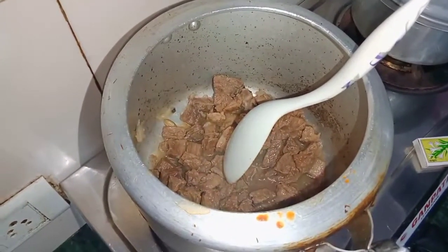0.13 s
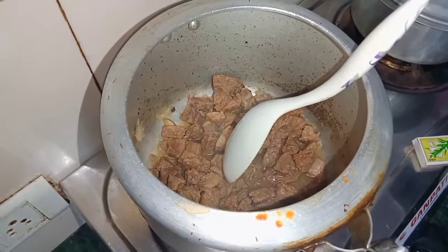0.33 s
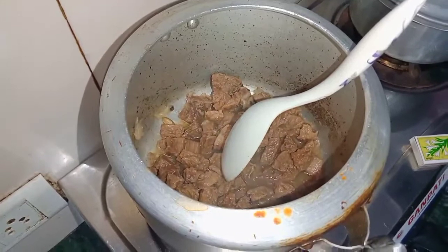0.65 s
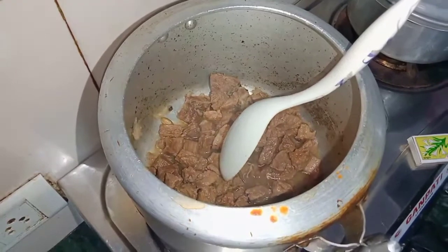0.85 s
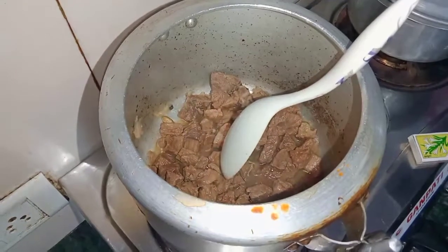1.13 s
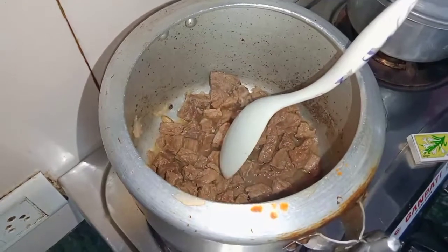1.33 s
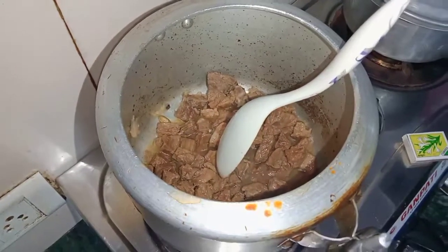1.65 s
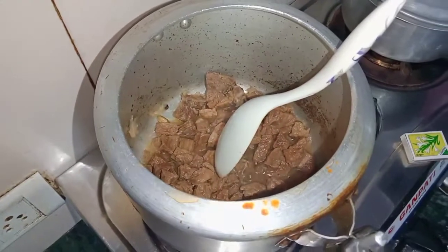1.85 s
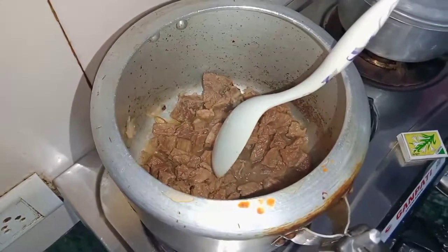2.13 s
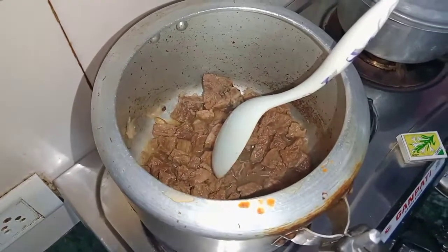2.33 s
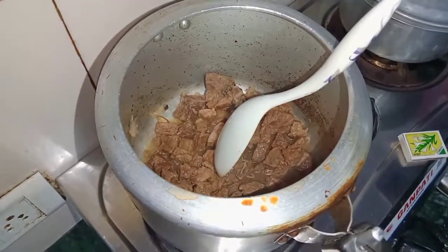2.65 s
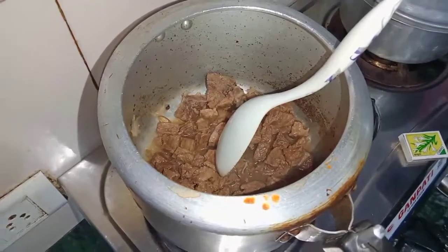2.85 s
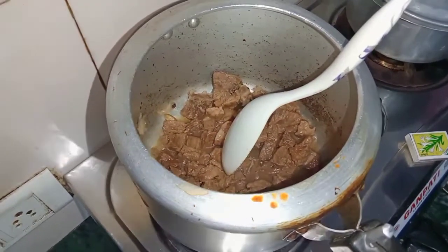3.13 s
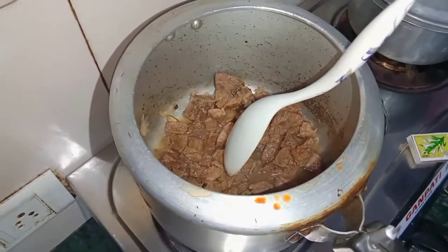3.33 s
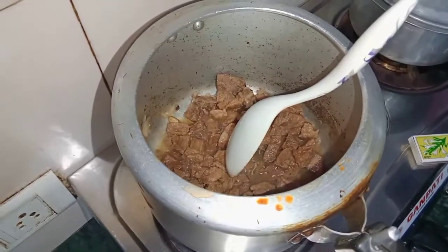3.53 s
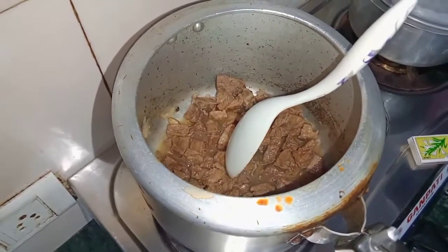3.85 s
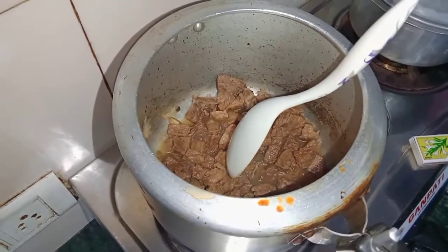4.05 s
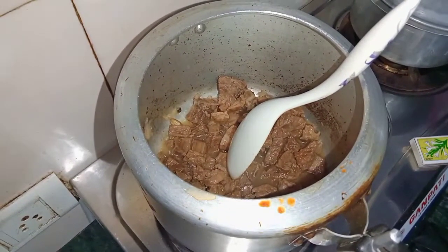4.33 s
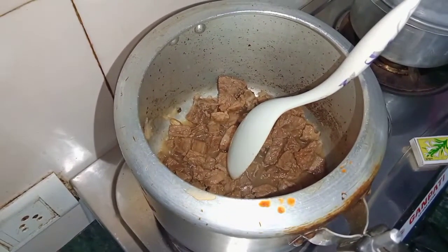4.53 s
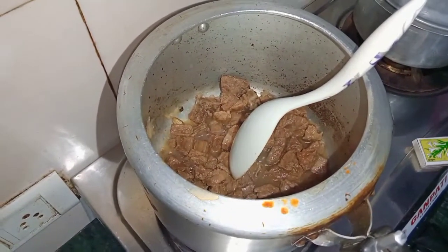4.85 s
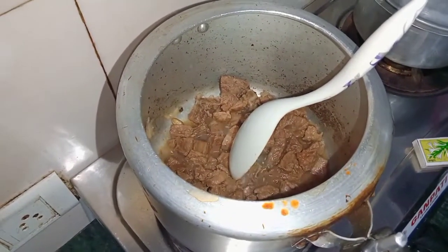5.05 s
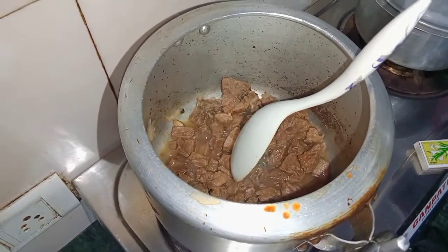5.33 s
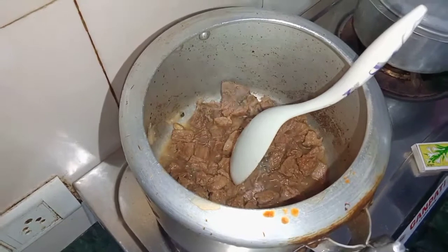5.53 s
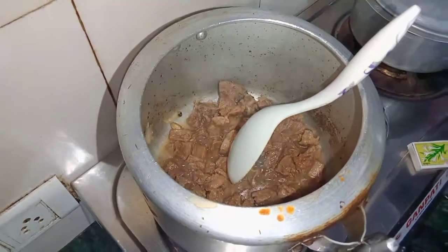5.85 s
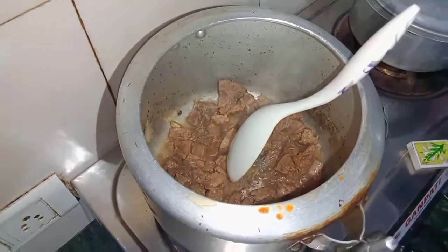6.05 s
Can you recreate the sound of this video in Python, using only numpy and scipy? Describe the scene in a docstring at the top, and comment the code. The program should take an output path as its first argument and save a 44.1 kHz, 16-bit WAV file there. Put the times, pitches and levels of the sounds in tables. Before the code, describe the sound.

Meat simmers and spits softly over a gas flame while metal cookware clatters in two flurries, then a silent gap and a final clunk.

```python
"""Meat simmers in an open pressure cooker on a gas ring in a small tiled kitchen: droplets spit, bubbles fizz.
Under it lie a flame, shaped noise, and a low drone of narrow noise bands that swells at times.
Close by, metal cookware is dragged, struck and rocked in two flurries: noisy crashes, ringing modes, stick-slip.
Then all sound cuts out for about 0.6 s; a faint rustle of grainy noise lies on either side of the gap.
Last, something stout is set down with a clunk, ringing in short modes. Both channels are the same."""
import sys
import numpy as np
from scipy import signal
from scipy.fft import irfft, next_fast_len
from scipy.io import wavfile
from scipy.ndimage import uniform_filter1d

SR = 44100
rng = np.random.default_rng(int(sys.argv[2]) if len(sys.argv) > 2 else 0)


def generate_wav(sig):
    """Save sig (samples, or channels by samples) to the path in sys.argv[1] as 16-bit PCM at SR."""
    pcm = np.round(np.clip(np.atleast_2d(sig).T, -1, 1) * 32767).astype(np.int16)
    wavfile.write(sys.argv[1], SR, pcm)


N = 273111


def cookware():
    """Impact and friction excite the modes of thin metal shells; the kind of contact sets spectrum and onset."""
    # modes of the cookware: f/Hz, relative level/dB, undamped t60/s
    cookware_modes = [(319.5, 1, 0.37), (372, 0, 0.49), (448, 1.5, .45), (577, -7, 0.67), (681, -6.5, 0.65),
                      (825.6, -7.5, 0.5), (996, -9.5, .37), (1081, -14.5, 1), (1276, -10, 0.62),
                      (1790, -15, 1), (1945, -11, .5), (2293, -14, .9), (2420, -9.5, .45),
                      (2730, -11.5, .5), (3097, -12, .4), (3160, -13, .35), (3400, -15, .55),
                      (3970, -14.5, .32), (4230, -10.5, 0.32), (5070, -8.5, 0.18), (8100, -22.5, .25)]
    thin_shell = weak_modes(spacing_hz=24, spread_db=1.5)
    knocks = blows(cookware_contacts(), cookware_modes, thin_shell, ring_db=0, crowd_db=-6.5, crash_db=1.5,
                   crash_life=0.95, treble_life=0.84, grain_db=0.0, full_ring_s=0.47, lowest_hz=120)
    return knocks + shudders(attack_s=0.012, sag_db_per_s=42, release_t60=0.17, wobble_db=1.4, wobble_hz=3)


def cookware_contacts():
    """Contact stiffness: strikes start fast, scrapes fast or slower row by row, bass-heavy thuds over 23 ms."""
    # metal strikes metal, sharp and bright:
    # t/s, level/dB, treble relative to the middle/dB, nominal t60/s, favoured f/Hz
    strike_rows = [(1.505, -30, -0.5, 0.61, 2370), (1.685, -14.5, -1, 0.33, 1100),
                   (1.992, -26.5, -9.5, 0.27, 4930), (2.008, -24, -3.5, 0.23, 1970),
                   (2.901, -24, -7.5, .24, 3400), (2.966, -24, 0, 0.22, 4360),
                   (3.0905, -17.5, -4, 0.24, 3040), (3.304, -21, -8.5, 0.29, 2200)]
    # a pot rocks and lands dully on its support: t/s, level/dB, nominal t60/s, favoured f/Hz
    thud_rows = [(1.527, -24.5, 0.23, 392), (1.711, -36.5, 0.097, 680), (2.012, -31.5, 0.099, 440),
                 (2.2, -39.5, 0.064, 337), (2.712, -31.5, 0.13, 520), (2.725, -27, 0.19, 850),
                 (3.102, -30, 0.089, 740)]
    # a pot is nudged or scrapes a little: t/s, level/dB, rise/s, treble relative to the middle/dB
    scrape_rows = [(1.456, -34.5, 0.0015, -7.5), (1.578, -42, 0.0037, -7), (1.655, -30.5, 0.0011, -2),
                   (1.892, -34.5, 0.0042, -7), (2.705, -36.5, 0.024, 6), (2.85, -35.5, .035, -4.5),
                   (3.06, -39, .005, 1), (3.36, -26.5, 0.012, -11)]
    # a rim gives a short clack: t/s, level/dB, favoured f/Hz
    clink_rows = [(1.943, -35, 2050), (3.293, -26, 2360)]
    strikes = [contact(s, db, rise_s=0.00067, t60=t60, bass_db=-6.5, treble_db=treble_db,
                       favoured_hz=hz, boost_db=7.0, width=0.11)
               for s, db, treble_db, t60, hz in strike_rows]
    thuds = [contact(s, db, rise_s=0.023, t60=t60, bass_db=5, treble_db=-10.5,
                     favoured_hz=hz, boost_db=6, width=0.094)
             for s, db, t60, hz in thud_rows]
    scrapes = [contact(s, db, rise_s=rise_s, t60=0.43, bass_db=0.5, treble_db=treble_db,
                       favoured_hz=760, boost_db=7, width=0.053)
               for s, db, rise_s, treble_db in scrape_rows]
    clinks = [contact(s, db, rise_s=0.0065, t60=0.04, bass_db=4, treble_db=-4.5,
                      favoured_hz=hz, boost_db=20, width=0.63)
              for s, db, hz in clink_rows]
    return strikes + thuds + scrapes + clinks


def shudders(attack_s, sag_db_per_s, release_t60, wobble_db, wobble_hz):
    """Stick-slip friction holds one low mode of a dragged pot ringing, unsteadily, until the pot stops."""
    # hollow tones: t/s, length/s, rms level before the sag/dB, f/Hz
    shudder_rows = [(1.525, .24, -16.5, 577), (1.526, .045, -21, 325.2), (1.529, .11, -28.5, 372),
                    (2.96, 0.049, -21.5, 639.4), (2.98, 0.022, -12.5, 373.8)]
    out, t = np.zeros(N), np.arange(SR) / SR
    for s, length, db, hz in shudder_rows:
        turns = np.cumsum(hz + wobble_hz * flicker(SR, smooth_s=0.03)) / SR
        level = from_db(db - sag_db_per_s * t + wobble_db * flicker(SR, smooth_s=0.02))
        envelope = np.minimum(t / attack_s, 1) * dying(np.maximum(t - length, 0), release_t60)
        add(out, s, np.sqrt(2) * level * envelope * np.sin(2 * np.pi * turns))
    return out


def clunk():
    """Impact on a stout body: a heavy thing lands squarely and settles, and its modes die soon."""
    # the clunk and its settling blows:
    # t/s, level/dB, treble relative to the middle/dB, nominal t60/s, favoured f/Hz
    clunk_rows = [(5.4638, -23, 2, 0.41, 724), (5.481, -26, -4, 0.46, 1460), (5.515, -24.5, -16, 0.31, 430)]
    # modes of the thing set down: f/Hz, relative level/dB, undamped t60/s
    stout_modes = [(349, 3.5, 0.13), (430, -12, 0.59), (520, 0.5, .34), (816, 10, 0.21), (1062, -0.5, 0.4),
                   (1460, 3, 0.25), (1707, 4.5, 0.26), (2860, 6.5, 0.11), (3075, 11, 0.18),
                   (3470, 11.5, .1), (3740, 4, 0.2), (4290, -12, .18), (4610, -2, .17), (5670, 0, 0.17),
                   (7880, -15, .2), (8100, -12, 0.29)]
    contacts = [contact(s, db, rise_s=0.0018, t60=t60, bass_db=10.0, treble_db=treble_db,
                        favoured_hz=hz, boost_db=4, width=0.25)
                for s, db, treble_db, t60, hz in clunk_rows]
    thick_shell = weak_modes(spacing_hz=40, spread_db=2)
    return blows(contacts, stout_modes, thick_shell, ring_db=-5.0, crowd_db=-18.0, crash_db=-1.0,
                 crash_life=0.75, treble_life=0.43, grain_db=3.5, full_ring_s=0.18, lowest_hz=264)


def contact(s, db, rise_s, t60, bass_db, treble_db, favoured_hz, boost_db, width):
    """Excitation of one blow: time, rise, decay, low, middle and high levels, and the region it favours."""
    return s, rise_s, t60, db + bass_db, db, db + treble_db, favoured_hz, boost_db, width


def blows(rows, modes, crowd, ring_db, crowd_db, crash_db, crash_life, treble_life, grain_db, full_ring_s, lowest_hz):
    """Modal synthesis: each blow is a noisy crash that leaves strong modes and a crowd of weak ones ringing."""
    # the crowd of weak modes between the strong ones: f/Hz, relative density/dB per Hz
    clatter = [(60, -67.5), (130, -28.5), (250, -31), (340, -32), (700, -24), (1200, -31.5), (2100, -31.5),
               (3200, -32), (4600, -37), (6800, -45), (8800, -47.5), (10000, -51.5), (12500, -57),
               (15500, -52)]
    # where a blow's low, middle (two ends) and high levels hold: f/Hz
    zones_hz = [520, 1300, 3000, 5500]
    out, t, hz = np.zeros(N), np.arange(SR) / SR, bins(SR)
    treble = hz ** 4 / (hz ** 4 + 7000 ** 4)   # share of the power that dies sooner
    radiated = hz ** 2 / np.hypot(hz ** 2, lowest_hz ** 2)   # a small body gives out little bass

    def fading(colour, t60):
        """Frequency-dependent damping: a ring of this colour dulls as it fades."""
        body = noise(colour * np.sqrt(1 - treble), SR) * dying(t, t60)
        top = noise(colour * np.sqrt(treble), SR) * dying(t, t60 * treble_life)
        return body + top

    for s, rise, t60, low_db, middle_db, high_db, favoured_hz, boost_db, width in rows:
        zones = list(zip(zones_hz, [low_db, middle_db, middle_db, high_db]))

        def strength_db(f):
            """Point excitation: the contact point favours one region of the spectrum."""
            favour = np.exp(-(np.log((f + 1) / favoured_hz) / width) ** 2)
            return at_hz(zones, f) + boost_db * favour

        colour = from_db(at_hz(clatter, hz) + strength_db(hz)) * radiated
        # every spot on the shell is near the nodes of some modes and the crests of others
        colour = colour * uneven(hz, step_hz=110, depth_db=4)
        # with grain above 0 dB the surfaces chatter while they are still in touch
        grain = rms_one(uniform_filter1d(rng.standard_normal(SR), size=70))
        chatter = from_db(grain_db * grain * np.exp(-t / 0.013))
        sound = from_db(crash_db) * fading(colour, t60 * crash_life) * chatter
        # weak modes are scarce in the bass, where the few strong ones rule
        crowd_colour = colour * crowd * hz ** 2 / (hz ** 2 + 700 ** 2)
        sound += from_db(crowd_db) * fading(crowd_colour, t60 * 1.59)
        held = min(t60 / full_ring_s, 1)   # a hand on the metal damps its ring
        for mode_hz, mode_db, mode_t60 in modes:
            level = from_db(mode_db + ring_db + strength_db(mode_hz) + rng.normal(0, 1))
            sound += level * np.sin(2 * np.pi * (mode_hz * t + rng.random())) * dying(t, mode_t60 * held)
        rise = max(rise, 0.0005)
        onset = np.minimum(t / rise, 1) / dying(rise, max(t60, 0.1))   # makes up for decay during the rise
        add(out, s, sound * onset)
    return out


def weak_modes(spacing_hz, spread_db, count=1200):
    """Modal density: a shell's weak modes lie at uneven steps and strengths; one value per hertz, rms 1."""
    lines = np.zeros(SR // 2 + 1)
    at = np.cumsum(rng.uniform(0.3, 1.7, count) * spacing_hz).astype(int)
    sizes = from_db(spread_db * np.clip(rng.standard_normal(len(at)), -2, 1.3))
    in_range = at < len(lines)
    lines[at[in_range]] = sizes[in_range]
    return rms_one(lines)


def spits(level_db, t60, width, splash_db):
    """Impulsive noise: each bursting fat droplet is a short pitched tick inside a broad splash."""
    # fat spits: t/s, level/dB, f/Hz
    spit_rows = [(.215, -55, 7600), (.404, -56, 12500), (0.574, -36, 6250), (.614, -42, 6400),
                 (.767, -52, 12000), (1.356, -42.5, 6460), (1.921, -43, 6830), (2.215, -44.5, 6600),
                 (2.41, -52.5, 7100), (2.861, -44, 12000), (3.227, -40, 6640), (3.575, -47, 7300),
                 (3.979, -41, 6360), (4.018, -49, 15100), (4.987, -44.5, 3030), (5.273, -45.5, 7940),
                 (5.389, -40.5, 6500), (5.745, -46, 7300), (6.047, -42, 7400)]
    out, t, hz = np.zeros(N), np.arange(SR // 4) / SR, bins(SR // 4)
    splash = from_db(splash_db) * hz ** 2 / (hz ** 2 + 3500 ** 2)
    for s, db, pitch_hz in spit_rows:
        tick = np.exp(-(np.log((hz + 1) / pitch_hz) / width) ** 2)
        add(out, s, from_db(db + level_db) * rms_one(noise(tick + splash, len(t))) * dying(t, t60))
    return out


def fizz(per_s, spread_db, ring_s, count=12):
    """Shot noise: tiny bubbles of uneven size and pitch burst at random in the gravy."""
    # colour of a bubble's pop: f/Hz, relative density/dB per Hz
    fizz_colour = [(300, -15), (2000, 21), (5000, 1), (8000, 0), (11000, -7.5), (15500, -5.5)]
    # the frying is steady but for a few livelier spells: from t/s, to t/s, extra level/dB
    fizz_spells = [(.05, .27, 3), (2.45, 2.95, 4.3), (4.18, 4.3, 16.8), (4.8, 5.02, 10), (5.05, 6.3, 3.2)]
    steady_db, edge_s = -53, 0.091
    sizes = from_db(spread_db * np.minimum(rng.exponential(1, N), 4))
    pops = (rng.random(N) < per_s / SR) * sizes
    t, hz = np.arange(SR // 10) / SR, bins(SR // 10)
    dealt = rng.integers(0, count, N)   # which of the pop sounds each bubble takes
    out = 0
    for k in range(count):
        pitched = uneven(hz, step_hz=500, depth_db=11)
        pop = noise(from_db(at_hz(fizz_colour, hz)) * pitched, len(t)) * dying(t, ring_s)
        out = out + signal.oaconvolve(pops * (dealt == k), pop)[:N]
    return from_db(steady_db + spells(fizz_spells, edge_s)) * rms_one(out)


def rustle(edge_s, grain_db):
    """Amplitude-modulated noise: something brushes lightly past, grainy and bright."""
    # faint bright rustles: from t/s, to t/s, level/dB
    rustle_rows = [(4.168, 4.25, -47), (4.886, 4.957, -50)]
    # colour of the rustle: f/Hz, relative density/dB per Hz
    rustle_colour = [(1500, -4), (4000, -4), (9500, -4), (15500, -3)]
    size = next_fast_len(N)
    hiss = noise(from_db(at_hz(rustle_colour, bins(size))), size)[:N]
    hiss = hiss * from_db(grain_db * flicker(N, smooth_s=0.0028))
    gains = [(start, end, from_db(db)) for start, end, db in rustle_rows]
    return rms_one(hiss) * spells(gains, edge_s)


def background():
    """Incoherent sum: the flame and the drone add up, and their common level dips briefly."""
    # the dip: from t/s, to t/s, change of level/dB
    lull_rows = [(2.26, 2.48, -4)]
    return from_db(spells(lull_rows, edge_s=0.055)) * (flame_roar() + low_drone())


def flame_roar():
    """Turbulent combustion noise: a soft steady roar with a broad spectrum."""
    # gas flame: f/Hz, relative density/dB per Hz
    flame_colour = [(25, -65.5), (55, -76), (85, -69.5), (115, -61), (280, -66), (550, -64.5), (950, -71.5),
                    (1500, -71.5), (3000, -80), (4500, -87.5), (6500, -99.5), (8500, -102.5), (11000, -106),
                    (15500, -104)]
    size = next_fast_len(N)
    hz = bins(size)
    # the corner behind the stove colours the roar with narrow resonances
    colour = from_db(at_hz(flame_colour, hz)) * uneven(hz, step_hz=22.35, depth_db=2.0)
    return from_db(0.2) * noise(colour, size)[:N]


def low_drone():
    """Narrow-band noise: random phases within narrow bands make a low tone that wavers."""
    # bands of the drone: f/Hz, width/Hz, relative level/dB
    drone_bands = [(129.1, 4.2, 20), (163.4, 36, 3)]
    # the drone is faint but for a few swells: from t/s, to t/s, extra level/dB
    drone_swells = [(3.02, 3.33, 11), (3.57, 3.92, 15), (4.02, 4.2, 11), (5.6, 6.3, 9)]
    faint_db, edge_s = -46, 0.03
    size = next_fast_len(N)
    hz = bins(size)
    colour = sum(from_db(db) / (1 + ((hz - f) / width) ** 2) ** 2 for f, width, db in drone_bands)
    return from_db(faint_db + spells(drone_swells, edge_s)) * rms_one(noise(colour, size)[:N])


def kitchen(x, wet_db):
    """Reverberation: tiled walls add a dense tail that dies sooner in the treble."""
    # reverberation time of the kitchen: f/Hz, t60/s
    room_t60 = [(150, 0.96), (1000, 0.61), (3000, 0.52), (7000, 0.23), (15000, 0.12)]
    t, hz, tail = np.arange(SR) / SR, bins(SR), 0
    edges = np.geomspace(60, 16000, num=9)
    for low, high in zip(edges, edges[1:]):
        band = noise(1. * ((hz >= low) & (hz < high)), SR)
        tail = tail + band * dying(t, at_hz(room_t60, np.sqrt(low * high)))
    tail = tail * np.clip(t / 0.0009, 0, 1)
    tail = tail / np.sqrt(np.sum(tail ** 2))   # unit energy
    return x + from_db(wet_db) * signal.fftconvolve(x, tail)[:N]


def microphone(x, port_hz, port_db):
    """Transducer response: the microphone sheds the deep bass, and its port resonates in the treble."""
    x = signal.sosfilt(signal.butter(2, 75, "high", fs=SR, output="sos"), x)
    port = signal.lfilter(*signal.iirpeak(port_hz, 10, fs=SR), x)
    return x + (from_db(port_db) - 1) * port


def from_db(db):
    """Level to amplitude: decibels to gain."""
    return 10 ** (np.asarray(db) / 20)


def rms_one(x):
    """Normalisation: scale to rms 1."""
    return x / np.sqrt(np.mean(x ** 2) + 1e-20)


def at_hz(points, hz):
    """Interpolation: read a table on a log-frequency axis."""
    return np.interp(np.log(hz + 1e-9), np.log(np.array(points)[:, 0]), np.array(points)[:, 1])


def bins(size):
    """Discrete spectrum: the bin frequencies for this many samples, in Hz."""
    return np.arange(size // 2 + 1) * SR / size


def noise(gain, size):
    """Random-phase synthesis: noise with the given amplitude per root hertz in each bin."""
    return irfft(gain * np.exp(2j * np.pi * rng.random(len(gain))), size) * np.sqrt(size * SR / 2)


def dying(t, t60):
    """Exponential decay: 60 dB in t60 seconds, which is at least 5 ms."""
    return from_db(-60 * t / np.maximum(t60, 0.005))


def add(track, s, sound):
    """Superposition: mix a sound in at a time in seconds."""
    at = max(round(s * SR), 0)
    track[at:at + len(sound)] += sound[:N - at]


def uneven(hz, step_hz, depth_db):
    """Modal overlap: random spectral peaks and valleys, as crowded resonances give; knots of mean power 1."""
    knots = from_db(depth_db * np.clip(rng.standard_normal(2048), -2, 2))
    return np.interp(hz / step_hz, np.arange(len(knots)), rms_one(knots))


def spells(rows, edge_s):
    """Envelope: a value ramps up, holds and ramps down over each spell, and is zero between them."""
    t = np.arange(N) / SR
    return sum(value * np.clip(0.5 + np.minimum(t - start, end - t) / edge_s, 0, 1) for start, end, value in rows)


def flicker(size, smooth_s):
    """Low-pass noise: a smooth random wobble, rms 1."""
    window = signal.windows.hann(max(int(smooth_s * SR), 3))
    return rms_one(signal.oaconvolve(rng.standard_normal(size), window, "same"))


def scene():
    """Superposition: reverberant cookware, clunk and cooking pot, with a dry rustle and background."""
    pot = spits(level_db=0.0, t60=0.14, width=0.15, splash_db=-16) + fizz(per_s=180, spread_db=-0.5, ring_s=0.057)
    mono = kitchen(cookware(), wet_db=-10.0) + kitchen(clunk(), wet_db=-14.5) + kitchen(pot, wet_db=-9)
    mono = mono + rustle(edge_s=0.023, grain_db=5) + background()
    return np.array([mono, mono])


def record(dry):
    """Transmission chain: port resonance, saturation that rounds peaks, a stretch of silence, and a top cut."""
    silent_from_s, silent_to_s, cutoff_hz = 4.229, 4.838, 15700
    t = np.arange(N) / SR
    live = uniform_filter1d(1. * ((t < silent_from_s) | (t > silent_to_s)), size=180)   # soft edges
    rounded = 0.89 * np.tanh(microphone(dry, port_hz=8110, port_db=9.5) / 1.064)
    return signal.sosfilt(signal.ellip(12, 0.3, 90, cutoff_hz, fs=SR, output="sos"), rounded * live)


dry = scene()
out = record(dry)
generate_wav(out)
```